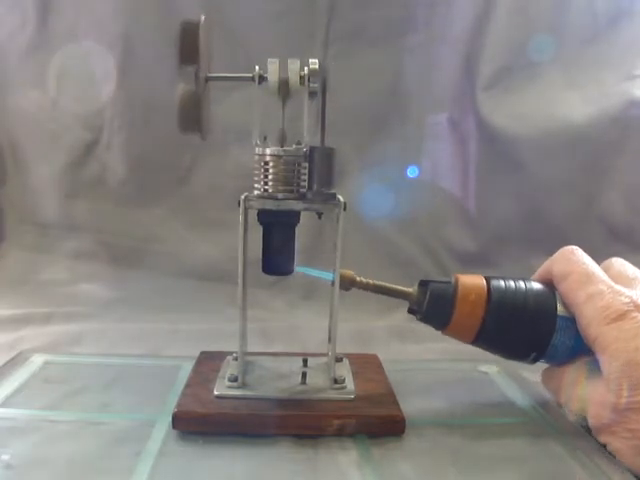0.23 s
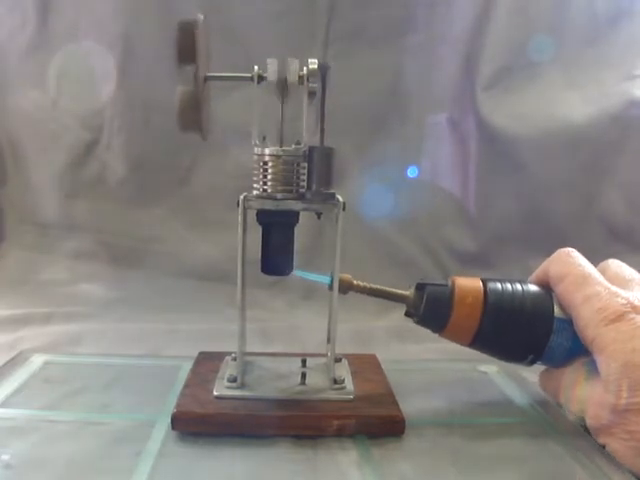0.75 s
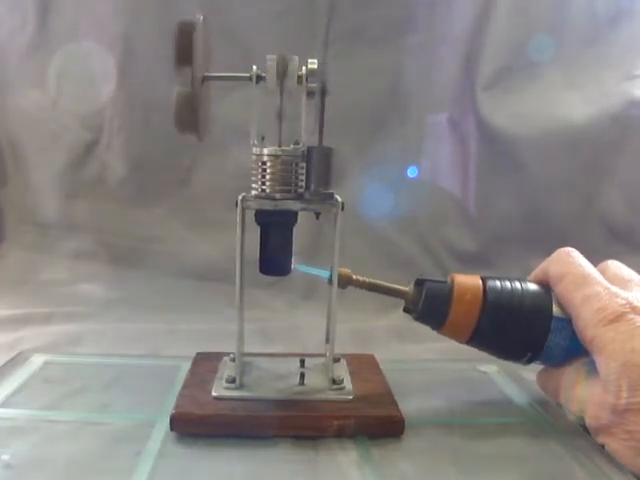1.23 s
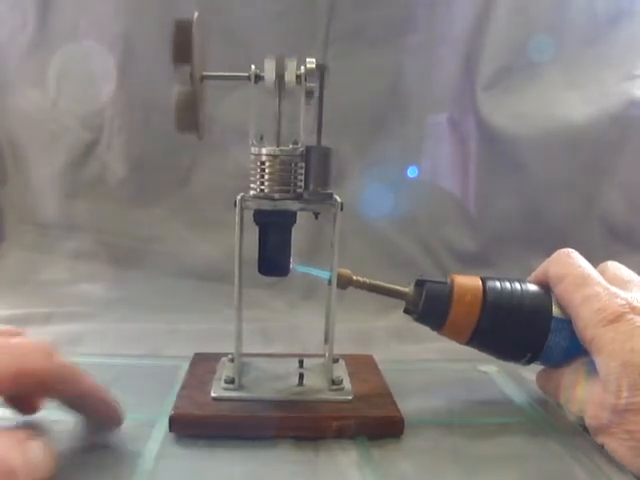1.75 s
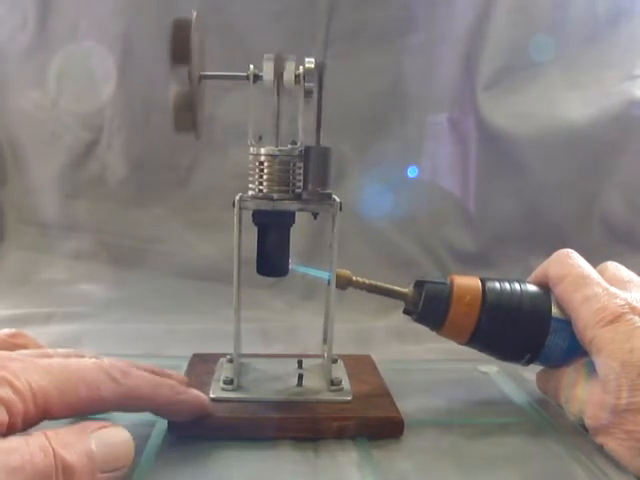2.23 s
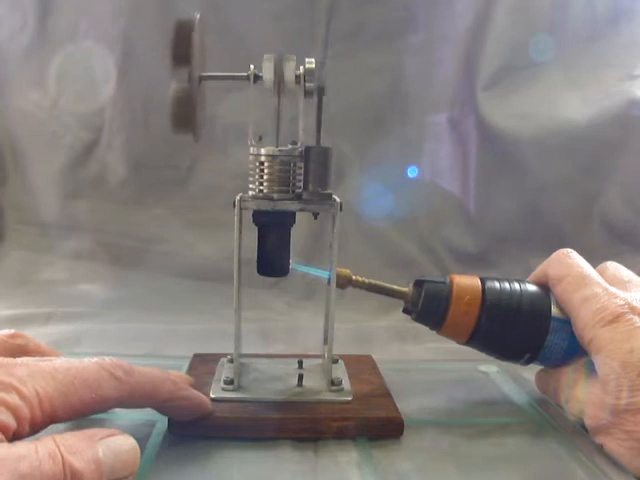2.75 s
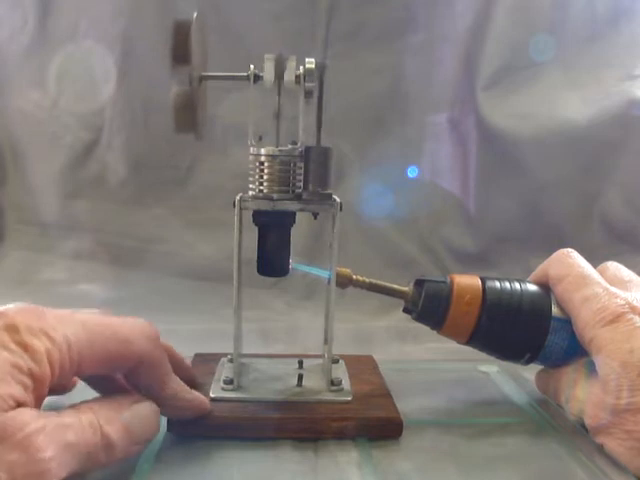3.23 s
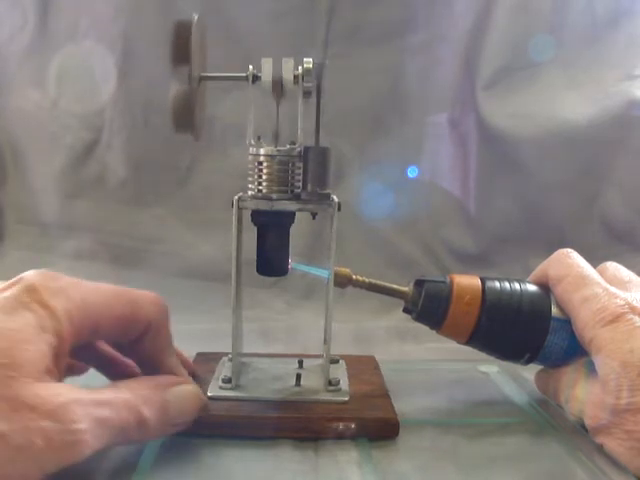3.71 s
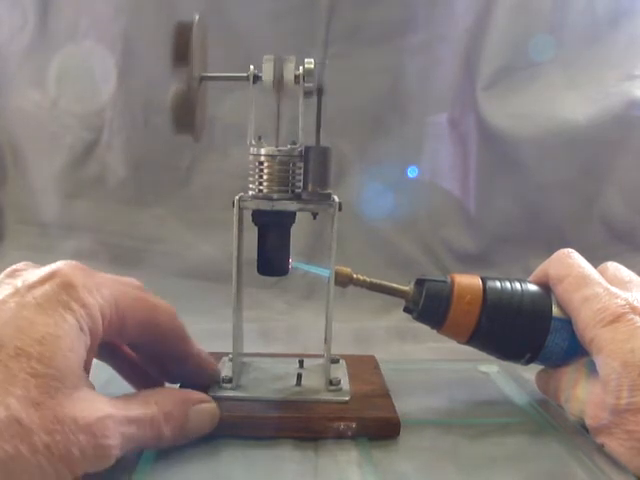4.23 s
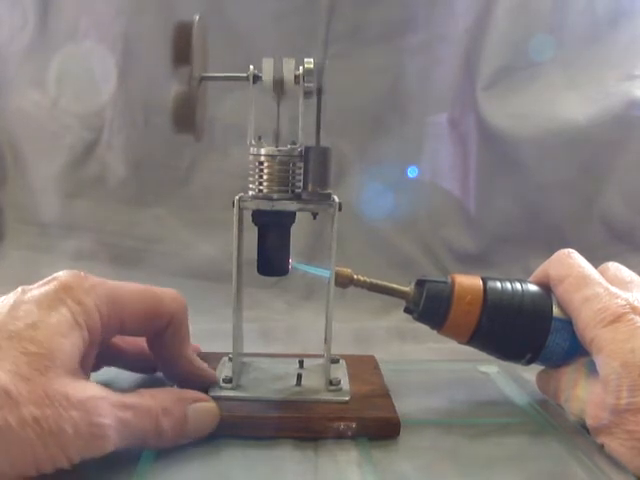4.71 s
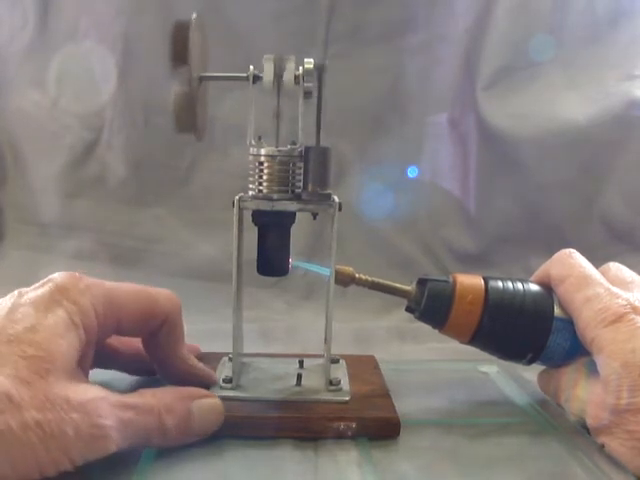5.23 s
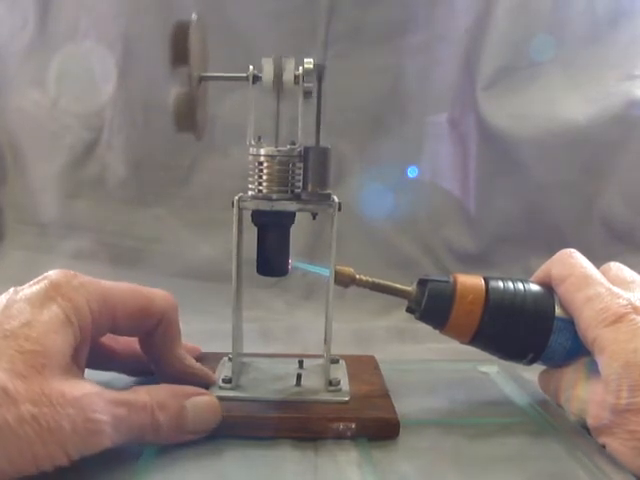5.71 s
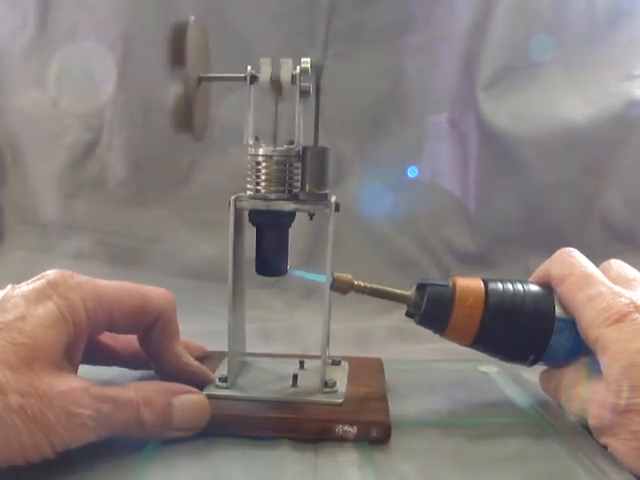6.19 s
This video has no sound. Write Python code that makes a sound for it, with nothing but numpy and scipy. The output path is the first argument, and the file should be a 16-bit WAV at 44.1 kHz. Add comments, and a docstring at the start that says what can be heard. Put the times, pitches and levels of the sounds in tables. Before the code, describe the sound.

A small hot-air engine runs close by in a small, damped room. Its slack linkage knocks once per turn, a bright steel click with ringing frame and wooden thump, so fast it becomes a buzzing clatter. It dips briefly, then gathers speed. After two seconds fingers touch the base and the knocking gains a hollow table boom. A torch flame hisses and flutters throughout; slight stereo, top treble cut off.

```python
"""A gas torch hisses at the hot cap of a small hot-air engine: flickering noise over a faint low rumble.
Once a turn the slack linkage knocks: steel clicks, frame rings, wooden base thumps; the return rattles softer.
The engine slows for a moment, then gathers speed. At 2.3 s fingertips touch the base and the table booms along;
by 4.6 s the whole hand holds it, by 5.95 s it pulls the base aside. Timed pushes strike banks of decaying
modes and shape bursts of noise."""
import sys
import numpy as np
from scipy import signal
from scipy.fft import rfft, irfft, next_fast_len
from scipy.io import wavfile
from scipy.ndimage import uniform_filter1d

SR = 44100
rng = np.random.default_rng(int(sys.argv[2]) if len(sys.argv) > 2 else 0)


def transcribe(u):
    """Save the signal u as a 16-bit wav file named by the first command-line argument.

    u: samples, shape (n,) or (channels, n), limited to [-1, 1]; the rate is SR.
    q: integer samples, one column per channel.
    """
    v = np.clip(np.atleast_2d(u).T, -1, 1)
    q = np.round(v * 32767).astype(np.int16)
    wavfile.write(sys.argv[1], SR, q)


N = 284886
TIME = np.arange(N) / SR
TAIL_N = SR // 2  # samples in a response


def amp(db):
    """Decibels to gain."""
    return 10 ** (np.asarray(db) / 20)


def curve(table, at):
    """Join the points of a table by straight lines."""
    return np.interp(at, *np.transpose(table))


def colour(x, spectrum):
    """Filter by a spectrum of (hz, db) points, interpolated over log frequency."""
    hz, db = np.transpose(spectrum)
    size = next_fast_len(N + SR // 10)
    log_hz = np.log(np.fft.rfftfreq(size, 1 / SR) + 1)
    gain = amp(np.interp(log_hz, np.log(hz), db))
    return irfft(rfft(x, size) * gain, size)[..., :N]


def band(x, low_hz, high_hz):
    """Small bodies radiate no bass, and a blunt contact excites no treble."""
    sos = signal.butter(3, [low_hz, high_hz], "band", fs=SR, output="sos")
    return signal.sosfilt(sos, x)


def unit(response):
    """Scale a response to a mean energy of one per channel."""
    return response / np.sqrt(np.mean(np.sum(response ** 2, axis=-1)))


def fade(t60_s):
    """Half a second of exponential decay."""
    return np.exp(-np.log(1000) * TIME[:TAIL_N] / t60_s)


def through(x, response):
    """Convolve a signal with a mono or stereo response."""
    return signal.fftconvolve(np.atleast_2d(x), np.atleast_2d(response), axes=-1)[:, :N]


def diffuse(size, apart_hz):
    """Noise at two close ports: alike in the bass, unrelated towards the treble."""
    mid, side = rng.standard_normal((2, size))
    b, a = signal.butter(1, min(apart_hz, SR / 3), "high", fs=SR)
    side = signal.lfilter(b, a, side)
    return np.array([mid + side, mid - side])


def ring(modes):
    """Response of (pitch_hz, energy_db, t60_s) modes struck together."""
    total = np.zeros(TAIL_N)
    for pitch_hz, energy_db, t60_s in modes:
        tone = fade(t60_s) * np.cos(2 * np.pi * pitch_hz * TIME[:TAIL_N])
        total += amp(energy_db) * unit(tone)
    return unit(total)


# flywheel speed: time_s, turns_per_s
SPEED = [(0.0, 13.13), (0.15, 12.724), (0.5, 13.23), (0.8, 13.47), (1.2, 13.757), (1.6, 14.157),
         (1.95, 14.471), (2.25, 14.484), (2.6, 14.799), (3.0, 15.169), (3.5, 15.457), (3.9, 15.8),
         (4.3, 16.151), (4.7, 16.349), (5.1, 16.669), (5.6, 16.846), (6.0, 17.134), (6.46, 17.216)]
FIRST_KNOCK_S = .0170


def crank():
    """Integrate the speed to flywheel turns since the first knock."""
    turns = np.cumsum(curve(SPEED, TIME)) / SR
    return turns - np.interp(FIRST_KNOCK_S, TIME, turns)


def strokes():
    """Number of the stroke under way, counted from a quarter turn before its knock."""
    return np.maximum(crank() + 1 / 4, 0).astype(int)


# hand on the base: time_s, grip [0 free, 1 fingertips, 2 whole hand, 3 pulling it aside]
GRIP = [(0, 0), (2.28, 0), (2.35, 1), (3.7, 1), (4.6, 2), (5.8, 2), (5.95, 3), (6.46, 3)]


def grip_share():
    """0 while the base stands free, 1 once the hand rests on it."""
    return np.minimum(curve(GRIP, TIME), 1)


def by_grip(values, grip):
    """Blend values listed by grip; the last holds for all firmer grips."""
    return np.interp(grip, np.arange(len(values)), values)


# strokes that slam home or barely catch: during_s, steel_bite_db, frame_bite_db
ODD_STROKES = [(0.02, -7, -10), (0.09, -2.5, -5), (0.48, 0.5, 8), (0.71, 0.5, -13), (0.85, 1.5, 14),
               (0.93, -1.0, 17), (1.0, 3.5, 7), (1.08, 5, 7), (1.15, 2.5, -10), (1.29, -1, -9),
               (1.44, 3.5, 9), (1.58, 3.5, 7), (1.86, 3.5, 1.5), (1.93, 2.5, 3), (2.14, 2, 15),
               (2.27, -8.5, -19), (2.34, -5, -4), (2.41, -2, -10), (2.55, 2.0, -5), (2.62, -1.5, -23),
               (2.82, -0.5, -1), (2.88, 4.5, -4), (2.95, 0, -7), (3.02, 1.5, -17), (3.08, -4, -19),
               (3.21, 7.5, 8), (3.28, 5, 8), (3.47, 4.5, -1), (3.67, 2.0, 9), (3.73, 5, 11), (3.79, 7, -5),
               (3.86, 3.5, 5), (3.92, -1.5, 4), (3.98, 0, -1), (4.05, -8, 1), (4.17, -3, -4), (4.23, 4, 8),
               (4.3, 7, 1), (4.42, -1, 1), (4.54, -2, -3), (4.6, -2, 1), (4.67, -2, -16), (4.73, -3.5, -1),
               (4.79, -4.5, -16), (4.97, -2.5, -1), (5.03, -4.5, -8), (5.09, -4.5, -6), (5.39, -6.5, 3),
               (5.45, 1.5, -6), (5.51, 2.5, -4), (5.63, -4, 3), (5.69, 3, 0), (5.8, -1.5, 4), (5.86, 4, 11),
               (5.92, 3.5, 14), (5.98, 7.5, 6), (6.04, -1.5, -9), (6.21, -3, -0.5), (6.27, 8, -4),
               (6.33, 0.5, 9)]
BITE_SCATTER_DB = 0.3  # between ordinary strokes


def bite():
    """How squarely the slack linkage catches: dB for steel and frame, new each stroke, odd strokes set."""
    stroke = strokes()
    db = BITE_SCATTER_DB * rng.standard_normal((stroke[-1] + 1, 2))
    for during_s, *odd_db in ODD_STROKES:
        db[stroke[int(during_s * SR)]] = odd_db
    return db[stroke].T


CRUISE_HZ = 15  # reference turns per second


def force(law, bite_db):
    """Blow level: grows with speed, changes under the hand, follows a share of the bite."""
    cruise_db, per_doubling_db, hand_db, bite_share = law
    speed_db = per_doubling_db * np.log2(curve(SPEED, TIME) / CRUISE_HZ)
    return cruise_db + speed_db + hand_db * grip_share() + bite_share * bite_db


# where a joint changes sides [share of the turn]
POWER, RETURN, ROD_UP = 0, .655, .43
# moments of a knock after that, at cruising speed [s]
TIP_S, CLICK_S, BLOW_S, BOUNCE_S, DROP_S = -.0001, 0, .0005, .0027, .0035
REBOUND_S, RATTLE_S, THUMP_S, SETTLE_S = .0052, .0080, .0135, .0180
HURRY = .25  # power of speed by which those delays shorten


def contacts(table, force_db, scatter_db, jitter_s, slack_db=0, slack_s=0):
    """Pushes of every turn, varied in time and level; unloaded joints have their own spread."""
    speed, turns, grip = curve(SPEED, TIME), crank(), curve(GRIP, TIME)
    turn = np.arange(int(turns[-1]) + 1)
    pushes = np.zeros(N)
    for place, delay_s, *grips_db in table:
        late, strong, loose = rng.standard_normal((len(turn), 3)).T
        late = 2 * uniform_filter1d(late, size=4)  # play in a joint wanders over a few turns
        unloaded = place != POWER
        when_s = np.interp(turn + place, turns, TIME, right=2 * TIME[-1])
        delays_s = delay_s * (CRUISE_HZ / curve(SPEED, when_s)) ** HURRY
        when_s = when_s + delays_s + jitter_s * late + unloaded * slack_s * loose
        i = np.clip((when_s * SR).astype(int), 0, N - 1)
        spread_db = (scatter_db + unloaded * slack_db) * strong
        level_db = force_db[i] + by_grip(grips_db, grip[i]) + spread_db
        inside = i < N - 1
        pushes[i] += amp(level_db) * np.sqrt(SR / speed[i]) * inside
    return pushes


def singles(table, delay_s=0):
    """One push per (time_s, level_db) row."""
    at_s, db = np.transpose(table)
    i = ((at_s + delay_s) * SR).astype(int)
    return np.bincount(i, amp(db) * np.sqrt(SR / CRUISE_HZ), N)[:N]


def chatter(pushes, share, t60_s):
    """Each push ends in a brief noisy chatter of the loose joint."""
    envelope = through(pushes, unit(fade(t60_s)))[0]
    return pushes + share * rng.standard_normal(N) * envelope


def body(pushes, modes, scatter_db, stiffening):
    """Decaying modes: strength follows grip and stroke; stiffening raises pitch with grip."""
    grip, stroke = curve(GRIP, TIME), strokes()
    clock_s = np.cumsum(1 + stiffening * (grip - 1)) / SR
    out = np.zeros(N)
    for pitch_hz, t60_s, *grips_db in modes:
        stroke_gain = amp(scatter_db * rng.standard_normal(stroke[-1] + 1))[stroke]
        drive = pushes * by_grip(amp(grips_db), grip) * stroke_gain
        swing = np.exp(2j * np.pi * pitch_hz * clock_s)
        keep = np.exp(-np.log(1000) / (t60_s * SR))  # decay per sample
        # one-pole decay around 0 Hz, shifted up to the mode's pitch
        envelope = signal.lfilter([np.sqrt(2 * (1 - keep ** 2))], [1, -keep], drive * swing.conj())
        out += (swing * envelope).real
    return out


# rumble spectrum: freq_hz, relative_db
RUMBLE = [(25, -16), (90, -18.0), (180, -11), (350, -3), (1000, -51)]
RUMBLE_DB, RUMBLE_HELD_DB = -59, 3  # level free, change under the hand


def rumble():
    """Faint low noise, different at each port, a little stronger with the hand on the base."""
    low = colour(rng.standard_normal((2, N)), RUMBLE)
    return low / low.std() * amp(RUMBLE_DB + RUMBLE_HELD_DB * grip_share())


# torch flame spectrum: freq_hz, relative_db_per_hz
FLAME = [(30, -33), (100, -15), (250, -3), (500, 5), (750, 10.5), (1100, 3.5), (2100, 4.5), (2900, -10),
         (4400, -9.5), (6300, -5.5), (8000, -12), (10300, -18.5), (12000, -47), (16000, -65)]
FLAME_DB = -37


def torch(flutter_db, flutter_hz):
    """The gas jet hisses as steady noise; the flame flutters its level through random points."""
    knots_s = np.arange(0, TIME[-1] + 1, 1 / flutter_hz)
    flutter = np.interp(TIME, knots_s, rng.standard_normal(len(knots_s)))
    hiss = colour(diffuse(N, apart_hz=5470), FLAME)
    return hiss / hiss.std() * amp(FLAME_DB + flutter_db * flutter)


# sway of the tall legs: pitch_hz, energy_db, t60_s
LEG_MODES = [(165.2, -3, 0.32), (184.1, -0.5, 0.23)]
LEGS_DB, LEGS_HELD_DB = -56, -4.5  # level free, change under the hand


def legs(shake):
    """The unbalanced flywheel keeps the legs humming, by pushes and random shake; the hand softens it."""
    pushes = contacts([(POWER, 0, 0)], np.zeros(N), scatter_db=1, jitter_s=.0001)
    sway = through(pushes + shake * rng.standard_normal(N), ring(LEG_MODES))
    hum = band(sway, low_hz=148, high_hz=214)
    return hum / hum.std() * amp(LEGS_DB + LEGS_HELD_DB * grip_share())


# base contacts in one turn: place_turns, delay_s, then level_db per grip from free upwards
BASE_CONTACTS = [(POWER, TIP_S, -2, -2.5, -3, -1), (POWER, DROP_S, 0.99, 0.55, 0.46, 2),
                 (POWER, THUMP_S, -3.9, -0.8, 1.5, -1), (POWER, SETTLE_S, -7.5, -9.5, -8, -2),
                 (RETURN, BLOW_S, -3, -9.5, -15.5, -10.5), (RETURN, DROP_S, -0.51, -11, -4.5, -8)]
# base on the table: pitch_hz [under fingertips], t60_s, then level_db for each of the four grips
BASE_MODES = [(287.5, 0.11, 3, 7, 6.5, 7), (333.6, .12, 11, 8, 3, 8), (404, 0.18, 6.5, 7.5, 4.5, 0),
              (591.6, 0.024, -1, 4, -1.5, 0.5), (683.8, 0.025, 11, 12, 11.5, 8),
              (777, 0.069, 1.5, -2.5, 8, 7), (791, 0.1, -18, -6.5, -6.5, 1), (996, 0.12, -26, -27, 4, 1)]
# base blow: cruise_db, per_speed_doubling_db, hand_db, bite_share
BASE_FORCE = (-35.5, 8.5, 7.5, 0)
BASE_CHATTER = .22  # share of noise


def base(bite_db):
    """Each stroke rocks the wooden base against the table; the grip decides which modes speak."""
    blow_db = force(BASE_FORCE, bite_db)
    pushes = contacts(BASE_CONTACTS, blow_db, scatter_db=0.63, jitter_s=.00005)
    pushes = chatter(pushes, BASE_CHATTER, t60_s=0.079)
    boom = body(pushes, BASE_MODES, scatter_db=0.14, stiffening=0.0068)
    return amp(-20.5) * band(boom, low_hz=512.4, high_hz=1007)


# frame contacts in one turn: place_turns, delay_s, then level_db per grip from free upwards
FRAME_CONTACTS = [(POWER, BLOW_S, 0.5, 0.47), (POWER, BOUNCE_S, 0, 0.69), (POWER, REBOUND_S, 0.69, 0.74),
                  (POWER, RATTLE_S, -2, -4), (POWER, THUMP_S, -23, -2.5), (POWER, SETTLE_S, -22, -7),
                  (ROD_UP, BLOW_S, -9.5, -11.5), (RETURN, DROP_S, -16, -3)]
# frame and cylinder: pitch_hz, t60_s, then level_db for each of the four grips
FRAME_MODES = [(1180, .09, 3.5, -6, -16, -13), (1230, 0.088, -3.5, 1.5, 3, -1),
               (1346.5, 0.071, 6, 9, 0.5, 1), (1395, .1, 5.5, -0.5, 7, -8), (1483, 0.046, -6, -6, 1.5, 7),
               (1559, 0.036, -1.5, -0.5, 4, 7.5), (1689, 0.037, 0, -4, 5, 5.5),
               (1845, 0.033, -0.5, 4, 3, 0), (1899, 0.034, 9, 7, 7, 10), (2073, 0.033, 7, 0, -2.5, 3),
               (2192, 0.081, -7, 1, 2.5, 4), (2285, 0.053, -4.5, -1.5, -8.5, -3),
               (2292, 0.15, -26, -14, -1.5, 0)]
# frame blow: cruise_db, per_speed_doubling_db, hand_db, bite_share
FRAME_FORCE = (-29.5, 3, 1, 0.17)
# second knocks of the frame: start_s, level_db
SECOND_KNOCKS = [(0.0305, -29), (0.1088, -24), (0.1876, -23.5), (0.2666, -31), (0.3425, -30), (2.6978, -33),
                 (2.8315, -30), (2.901, -27), (2.9673, -30), (3.0335, -26), (3.0996, -25), (3.1651, -24),
                 (3.2261, -26), (4.0642, -30), (5.7617, -27)]
FRAME_CHATTER = .4  # share of noise


def frame(bite_db):
    """The crank takes up its slack, rebounds and rings the metal; now and then it knocks again and bounces."""
    blow_db = force(FRAME_FORCE, bite_db)
    pushes = contacts(FRAME_CONTACTS, blow_db, scatter_db=2, jitter_s=0.00012, slack_db=-0.5, slack_s=.0008)
    bounces = amp(-13.5) * singles(SECOND_KNOCKS, delay_s=RATTLE_S)
    pushes = pushes + singles(SECOND_KNOCKS) + bounces
    pushes = chatter(pushes, FRAME_CHATTER, t60_s=0.017)
    rings = body(pushes, FRAME_MODES, scatter_db=1.5, stiffening=0)
    return amp(-23.5) * band(rings, low_hz=1040, high_hz=2276)


# steel contacts in one turn: place_turns, delay_s, then level_db per grip from free upwards
STEEL_CONTACTS = [(POWER, CLICK_S, 0, 0), (POWER, REBOUND_S, -7, -8.5), (POWER, SETTLE_S, -20.5, -16),
                  (ROD_UP, CLICK_S, -17.5, -14), (RETURN, CLICK_S, -18.5, -17.5),
                  (RETURN, DROP_S, -39, -16)]
# steel blow: cruise_db, per_speed_doubling_db, hand_db, bite_share
STEEL_FORCE = (-36, 9, -1, 0.67)
# sharper ticks of the rod joints between strokes: start_s, level_db
ROD_TICKS = [(2.794, -54), (3.125, -48), (3.5157, -55), (3.7567, -50), (3.8204, -55), (4.1356, -47),
             (4.3842, -52), (6.0766, -39), (6.367, -43)]
# thin tones of the rods: pitch_hz, energy_db, t60_s
ROD_MODES = [(4590, -3, 0.11), (5790, -15, 0.079), (6303, 1, 0.052), (7030, -15, 0.23), (7220, -9, 0.036),
             (7540, 1, 0.05), (8100, 2.5, 0.03), (9800, 7, 0.018)]
# spectrum over all steel sounds, crank and bearings: freq_hz, relative_db
STEEL = [(200, -59), (900, -7.5), (1500, 2), (2200, 8.5), (2600, -6.5), (2900, -0.5), (3500, -7.5),
         (4050, -3.5), (4600, -4.5), (5500, 2), (6300, 2.5), (7500, 0), (8900, -3), (10400, -8.5),
         (12000, -10), (14300, -15), (16000, -40)]


def steel(bite_db):
    """Steel on steel: a noise crack new at every blow, a dense ring of small parts, a few thin tones."""
    blow_db = force(STEEL_FORCE, bite_db)
    pushes = contacts(STEEL_CONTACTS, blow_db, scatter_db=0.5, jitter_s=.00008, slack_db=3.0, slack_s=0.0011)
    pushes = chatter(pushes + singles(ROD_TICKS), share=0.81, t60_s=0.044)
    grit = diffuse(N, apart_hz=9400)
    crack_power = abs(through(pushes ** 2, unit(fade(t60_s=0.0072)) ** 2))
    crack = grit / grit.std() * np.sqrt(crack_power)
    dense_ring = unit(fade(t60_s=0.068) * diffuse(TAIL_N, apart_hz=5000))
    rings = amp(-11.5) * dense_ring + amp(-11) * ring(ROD_MODES)
    return amp(2.5) * colour(crack + through(pushes, rings), STEEL)


def room(x, t60_s, wet_db, gap_s):
    """A small, damped room: decaying noise reflections that build up after a short gap."""
    build_up = 1 - np.exp(-(TIME[:TAIL_N] / gap_s) ** 2)
    reflections = unit(diffuse(TAIL_N, apart_hz=1630) * fade(t60_s) * build_up)
    return x + amp(wet_db) * through(x, reflections)


def scene():
    """Engine in the room, plus torch and rumble."""
    steel_bite_db, frame_bite_db = bite()
    engine = frame(frame_bite_db) + base(frame_bite_db) + legs(shake=0.046) + steel(steel_bite_db)
    engine = room(engine, t60_s=0.12, wet_db=-8.5, gap_s=0.0012)
    return engine + torch(flutter_db=3.0, flutter_hz=6.5) + rumble()


# stereo balance of the recorder: freq_hz, left_minus_right_db
BALANCE_DB = [(100, -.5), (600, -1.5), (1100, -2), (3500, -1.5), (6300, -1), (11000, .5)]
# narrow notches of the camera's filter near whole kilohertz: center_hz, width_hz
NOTCHES = [(1065, 37), (1995, 7.3), (3010, 333), (4000, 527), (5020, 390)]
TOP_HZ = 10700


def record(dry):
    """The recorder leans right except in the top treble, notches narrow bands and cuts the top."""
    hz, lean_db = np.transpose(BALANCE_DB)
    left = colour(dry[0], np.c_[hz, lean_db / 2])
    right = colour(dry[1], np.c_[hz, -lean_db / 2])
    out = np.array([left, right])
    for notch_hz, width_hz in 2 * NOTCHES:  # twice, for steep sides
        b, a = signal.iirnotch(notch_hz, notch_hz / width_hz, fs=SR)
        out = out - 0.72 * (out - signal.lfilter(b, a, out))  # partial notch
    return signal.sosfilt(signal.ellip(5, .5, 32, TOP_HZ, fs=SR, output="sos"), out)


dry = scene()
out = record(dry)
transcribe(out)
```